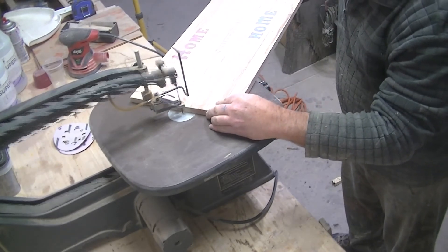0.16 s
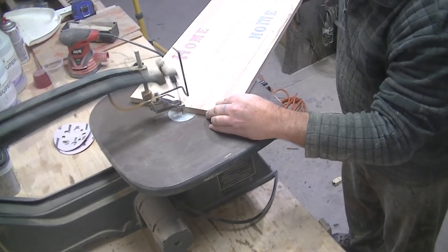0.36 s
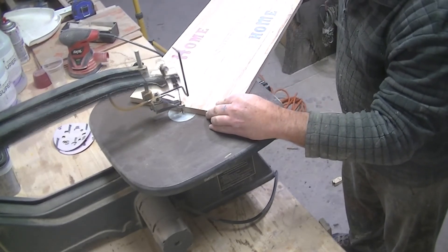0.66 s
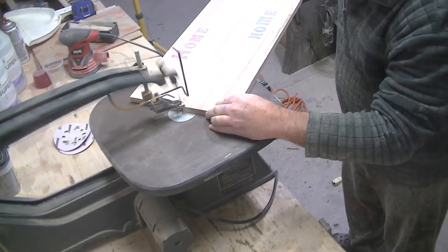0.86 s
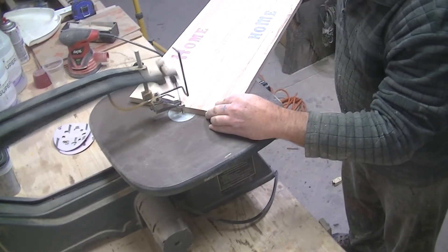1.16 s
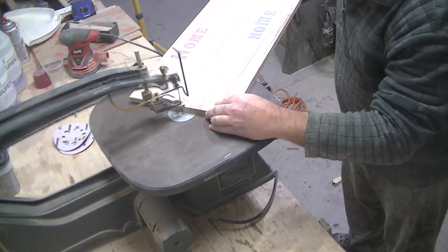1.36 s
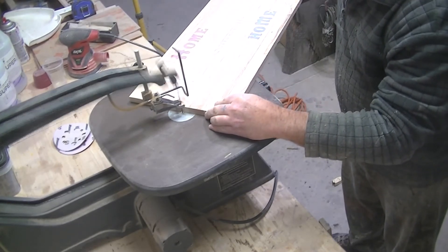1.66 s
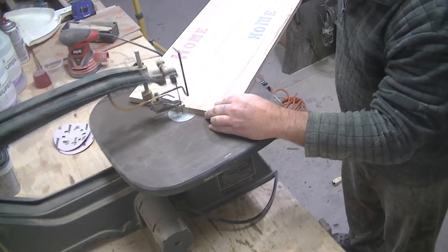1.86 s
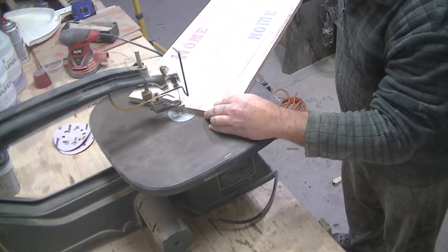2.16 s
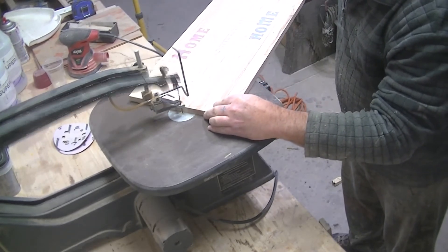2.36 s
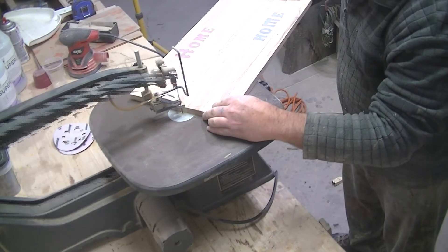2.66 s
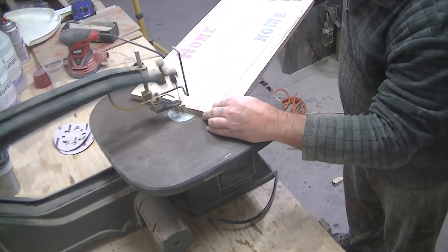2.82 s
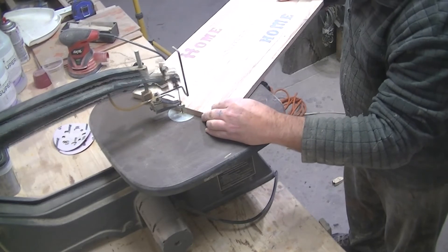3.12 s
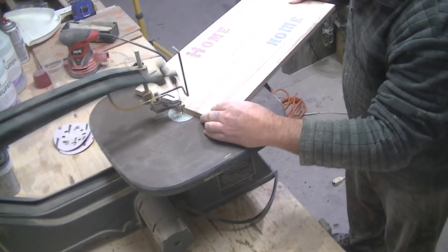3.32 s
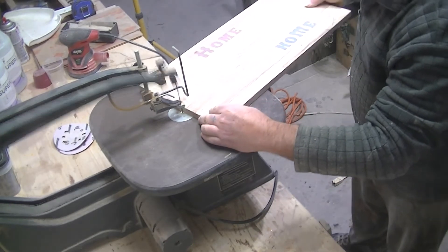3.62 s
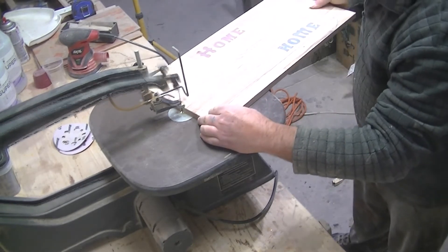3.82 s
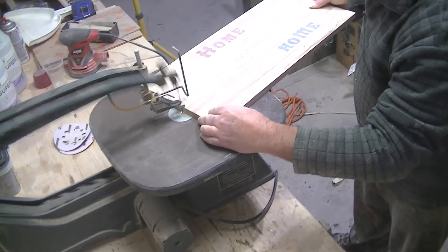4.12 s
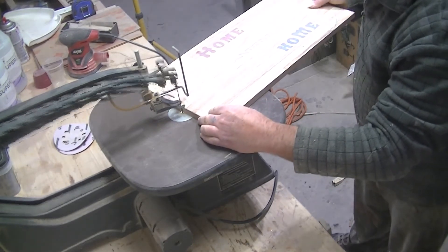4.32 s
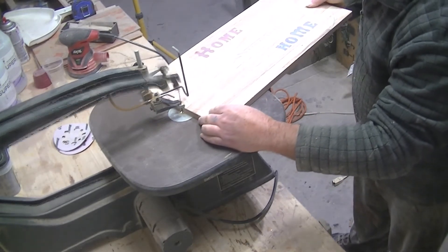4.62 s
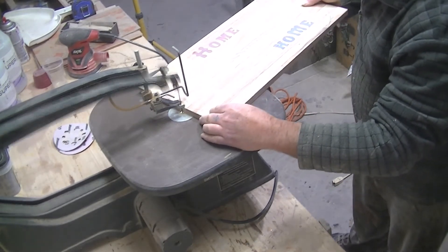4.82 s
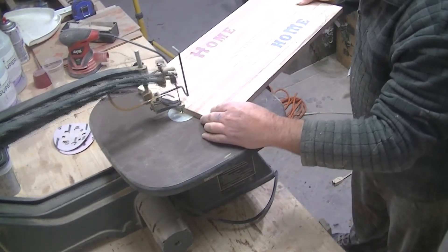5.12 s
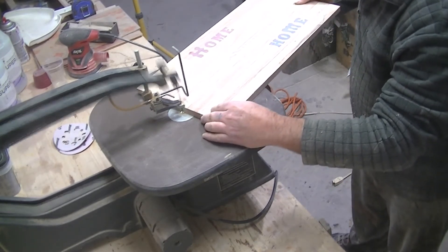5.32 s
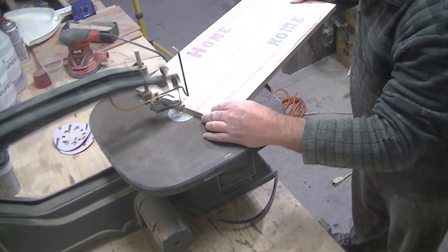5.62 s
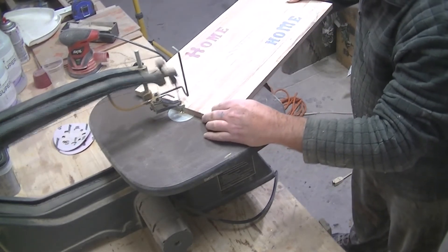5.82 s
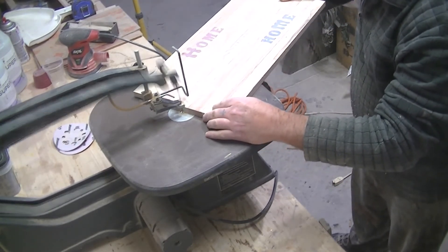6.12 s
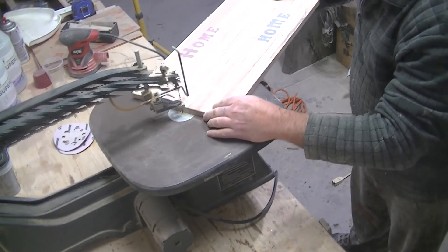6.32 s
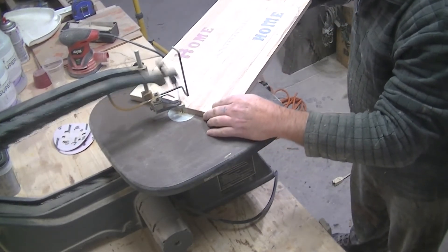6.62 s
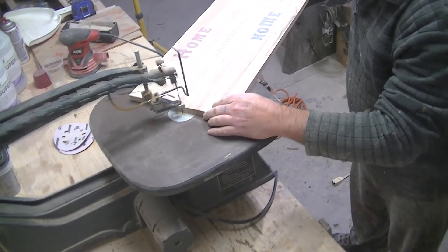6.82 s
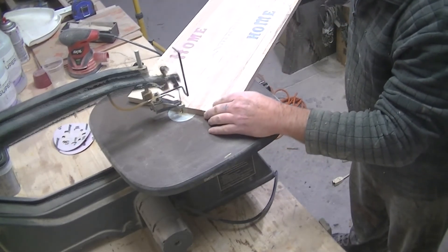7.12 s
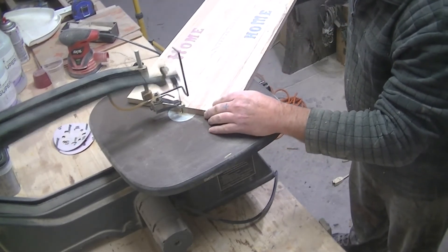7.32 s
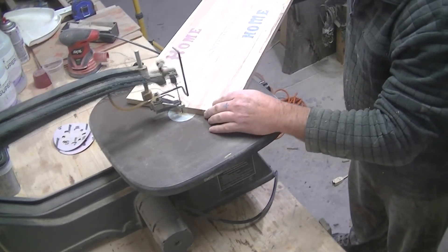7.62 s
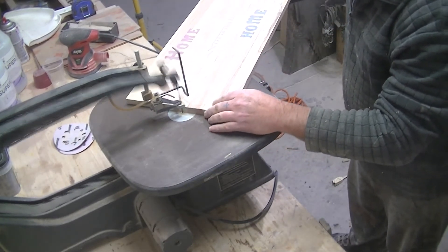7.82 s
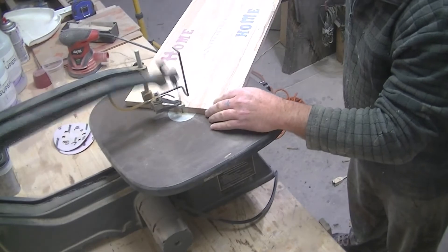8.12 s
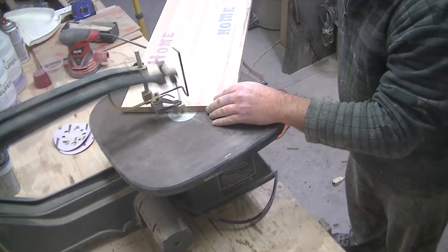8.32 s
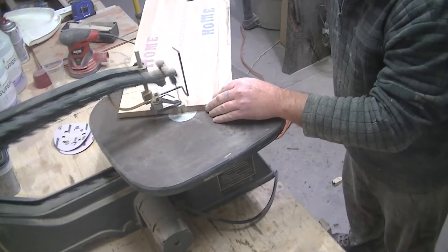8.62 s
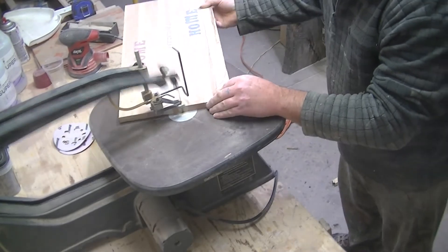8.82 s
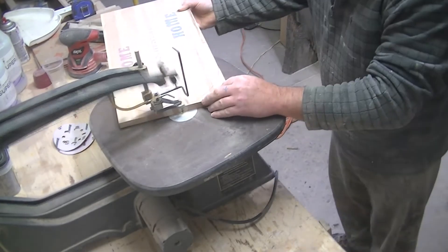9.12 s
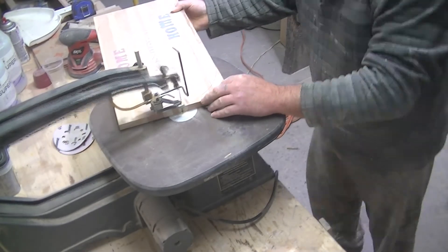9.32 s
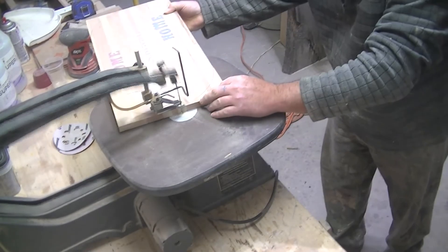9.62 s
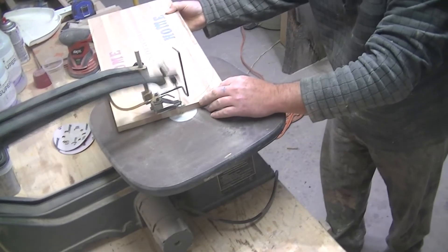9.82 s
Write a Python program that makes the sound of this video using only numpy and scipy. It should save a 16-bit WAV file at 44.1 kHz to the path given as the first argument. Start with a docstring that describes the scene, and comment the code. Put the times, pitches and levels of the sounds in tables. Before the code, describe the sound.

Close by in a small workshop, a scroll saw chatters through a wooden board at a fast, even pace. The frame hums, loose parts rattle and the blade rasps and rings, while the board now and then jumps and knocks on the table. Near the end the sawing abruptly gives way to a quiet, high, sped-up buzz with a sizzling hiss.

```python
"""A scroll saw cuts a glued board in a small workshop, at about 31 strokes a second.
Its arm clacks and makes the frame hum, loose parts rattle, and the teeth rasp and squeak in the wood.
The blade also lifts the board, which knocks as it lands back on the table.
After a quick fade the sawing returns, sped up eight times: a thin, quiet, hissy buzz."""
import sys
import numpy as np
from scipy import signal
from scipy.fft import irfft, next_fast_len
from scipy.io import wavfile

SR = 44100
rng = np.random.default_rng(int(sys.argv[2]) if len(sys.argv) > 2 else 0)


def master_out(mix):
    """Clip the mix to full scale and print it as 16-bit PCM to the path in sys.argv[1]."""
    frames = np.transpose(np.atleast_2d(mix))
    ceiling = np.clip(frames, -1, 1)
    pcm = np.round(ceiling * 32767).astype(np.int16)
    wavfile.write(sys.argv[1], SR, pcm)


N = 439236

# One turn of the crank is one stroke of the blade. An angle is a place in that turn, from 0 to 1.
# how fast the crank turns while cutting: time_s, strokes_per_s
CRANK_SPEED = [(0.0, 31.251), (0.8, 31.243), (1.6, 31.194), (2.05, 31.175), (2.22, 30.789), (2.38, 31.222),
               (2.6, 31.122), (3.0, 31.183), (4.0, 31.206), (5.0, 31.214), (6.0, 31.177), (7.0, 31.167),
               (8.12, 31.192)]
# how hard the hand pushes the board into the blade (0 is ordinary): time_s, push_db
HAND_PUSH = [(0.0, 0), (0.22, -2), (0.75, -0.5), (1.08, 1), (1.6, 2), (2.68, 2), (2.82, 0), (3.04, 1.75),
             (3.6, 1), (4.2, 0.3), (4.98, 2.5), (5.3, -0.5), (5.65, -1.5), (6.0, -1.3), (6.35, -2.5),
             (6.62, 0), (7.1, -0.5), (8.08, 0.1)]
# where the arm's loose joints clack in each stroke: angle_turns, relative_db
ARM_CLACKS = [(.05, -0.5), (0.279, -1), (.48, 1), (.745, -2.5), (.88, 1)]
# the tones in the hum of frame and table: stroke_rate_multiple, relative_db
FRAME_TONES = [(1, -40), (2, -28), (3, -29.5), (4, -27.5), (5, -25), (6, -23), (7, -20), (8, -21.5),
               (9, -18.5), (10, -17.5), (11, -11), (12, -15.5), (13, -4), (14, -5), (15, -3), (16, -5.5),
               (17, -7.5), (18, -5), (19, -14.5), (20, 1.5), (21, -41.5), (22, -71), (23, -25.5), (24, 0),
               (25, -22), (26, -23), (27, -17.5), (28, -7.5), (29, -3), (30, -1), (31, -3), (32, 2.5),
               (33, -3.5), (34, -5.5), (35, 0), (36, -8), (37, -7), (38, -35), (39, -7), (40, -11),
               (41, -1.5), (42, -1.5), (43, -2.5), (44, 0), (45, -31), (46, -21), (47, -23), (48, -2),
               (49, -5), (50, -32.5), (51, -5), (52, 1)]
# the tones at which board and table ring: stroke_rate_multiple, level_db, db_per_push_db
BOARD_TONES = [(31, -43, 0), (35, -41, -0.9), (44, -42.5, 2.5), (48, -44.5, 2.6), (49, -40, 0.3)]
# a loose grip lets one of them sing out: start_s, end_s, stroke_rate_multiple, boost_db
BOARD_SINGING = [(0.4, 0.7, 31, 11.5), (3.293, 4.107, 44, 10.5), (4.327, 4.736, 44, 10), (5.95, 6.1, 44, 7),
                 (6.523, 6.72, 44, 11.5), (7.4, 7.753, 44, 14), (6.72, 6.9, 48, 8.5),
                 (7.45, 8.12, 48, 15.5)]
# rubbing over one stroke, weakest where the blade turns round: angle_turns, level_db
STROKE_RUBBING = [(0, 1), (.12, 1), (.3, 2), (.45, -1.5), (.62, -7.5), (.74, -3.5), (.86, 1.5)]
# the tone colour of saw and board: pitch_hz, relative_db
SAW_COLOUR = [(35, -85), (60, -42.5), (248, -20.5), (403, -11), (533, -16.5), (613, -7), (673, -11),
              (738, -8.5), (1320, -3), (2050, -8.5), (2250, -6.5), (4630, -15), (6120, -17.5),
              (7540, -19.5), (10500, -28.5), (15500, -37)]
# where arm, blade and table resonate: pitch_hz, width_hz, boost_db
SAW_RESONANCES = [(1880, 270, 3.5), (2210, 99, 2.5), (3130, 280, 0), (3485, 270, 5), (3980, 140, -1.5),
                  (4700, 210, 4), (5560, 200, 4.5), (6340, 410, 1.5), (6680, 480, 5.5), (7480, 590, 7),
                  (7930, 120, 4.5), (8600, 320, 6), (9240, 490, 3), (9750, 520, 5.5), (10500, 480, 5),
                  (11600, 260, 6.5)]
# the teeth rasp twice a stroke, going up and going down: angle_turns, level_db
TOOTH_RUBBING = [(.05, -3), (.16, 2), (.28, 0.5), (.42, -1), (.6, -5), (.7, -2), (.82, 3), (.92, -1)]
# the teeth only skim the wood, so the rasp is softer: start_s, end_s, change_db
LIGHT_CUTS = [(5.297, 5.78, -0.3), (6.18, 6.522, -2.3)]
# the notes of the tight blade: pitch_hz, width_hz, relative_db
BLADE_NOTES = [(4630, 160, 0), (5580, 220, -4)]
# how loudly the blade rings: time_s, level_db
BLADE_LOUDNESS = [(0, -45), (.4, -41), (.75, -42), (1.1, -39), (1.7, -37.5), (2.3, -37), (2.8, -42),
                  (3.5, -43), (4.0, -41.5), (4.6, -45), (5.6, -46), (6.0, -42), (6.35, -49), (6.9, -41.5),
                  (7.5, -45), (8.0, -42)]
# bands of rough rasp or ringing swell and fade:
# middle_s, half_length_s, pitch_hz, glide_hz_per_s, width_hz, level_db
RASP_SWELLS = [(0.02, 0.28, 2050, 0, 170, -31), (1.4, 0.48, 6200, -6, 2580, -48),
               (1.47, 0.26, 2700, 6, 200, -36), (1.3, 0.79, 2250, 0.5, 130, -41),
               (2.237, 0.13, 1690, 0, 260, -26.5), (2.66, 0.14, 2670, -6.5, 450, -32.5),
               (3.95, 0.55, 1905, 1.5, 130, -34.5), (3.065, 0.27, 1800, -1800, 507, -26),
               (3.4, 0.61, 2910, -18, 300, -37), (3.555, 0.19, 950, -3, 500, -26),
               (3.73, 0.68, 5150, -1, 250, -40), (4.824, 0.29, 1143, 4.5, 597, -27.5),
               (4.95, 0.057, 4100, -4, 600, -29.5), (5.0, 0.34, 3040, -13, 330, -35),
               (5.495, 0.66, 1035, 1, 175, -32), (4.5, 1.6, 2910, 1.5, 260, -42),
               (6.85, 0.35, 2220, -2, 180, -33.5), (7.05, 0.76, 951, 1, 110, -34),
               (7.2, 0.26, 1310, 0, 500, -30), (0.657, 0.11, 1250, 0, 450, -30),
               (4.75, 0.73, 938, 1.5, 140, -35), (7.29, 0.24, 2850, -2600, 380, -38),
               (7.846, 1.4, 1554, 154.5, 220, -34.5)]
# the tone colour of the board's knock: pitch_hz, relative_db
KNOCK_COLOUR = [(50, -65), (100, -48), (180, -27.5), (400, -23.5), (750, -5.5), (1350, 1.5), (1800, -1.5),
                (2800, -18.5), (5000, -32), (15000, -73)]
# where the board resonates when it lands: pitch_hz, width_hz, boost_db
BOARD_RESONANCES = [(183, 60, 4.5), (820, 260, 4.5), (1294, 380, 8), (1800, 260, 2.5), (2840, 700, 16.5)]
# the board hammers on the table: start_s, end_s, level_db, lands_early_turns
BOARD_JUMPS = [(0.764, 1.106, -29.5, 0.02), (1.38, 2.13, -29.5, 0), (2.129, 2.467, -26.5, 0.1292),
               (3.058, 3.26, -34, 0.03), (3.268, 3.877, -29, 0.07), (3.896, 4.41, -34, 0.01),
               (4.426, 4.703, -30, 0.01), (4.71, 5.2, -35.5, 0.013), (6.55, 7.3, -47.5, 0),
               (7.297, 7.51, -36.5, 0), (7.515, 8.1, -32.5, 0.07)]
# its hardest landings: time_s, peak_db
BOARD_SLAMS = [(0.797, -16.5), (0.829, -15), (0.924, -18), (0.957, -16), (1.469, -13), (1.919, -12.5),
               (2.012, -11), (2.171, -8), (2.236, -14.5), (2.298, -7.5), (2.363, -10), (3.331, -9.5),
               (3.456, -11.5), (3.684, -12.5), (4.485, -16), (4.517, -12), (4.549, -13), (4.581, -12),
               (7.593, -14), (7.625, -14)]
# a few teeth catch and squeak: start_s, end_s, pitch_hz, width_hz, angle_turns, level_db
TOOTH_SQUEAKS = [(3.12, 4.2, 1800, 170, 0.27, -37), (6.85, 7.45, 2900, 550, 0.48, -41),
                 (3.9, 4.7, 10240, 1500, 0.7, -54), (3.85, 4.45, 7000, 400, 0.23, -44),
                 (7.45, 8.15, 7400, 900, 0.36, -44), (4.9, 4.9, 7350, 400, 0.45, -46),
                 (5.98, 6.17, 9100, 600, 1, -48.5), (6.4, 7.4, 7570, 360, 0.27, -44.5),
                 (7.55, 8.08, 9600, 450, 0.71, -54.5), (7.7, 8.1, 1600, 240, .82, -40)]

# the crank's speed in the sped-up sawing: time_s, strokes_per_s
FAST_CRANK_SPEED = [(8.15, 249.7), (8.44, 249.4), (8.6, 248.3), (8.7, 249), (9.01, 249), (9.04, 234),
                    (9.09, 242), (9.165, 245.7), (9.27, 248.2), (9.48, 249), (9.8, 248.5), (9.96, 246.5)]
# the hand's push in the sped-up sawing: time_s, push_db
FAST_HAND_PUSH = [(8.16, 0.5), (8.22, -1.5), (8.33, 0), (8.41, -6), (8.46, 4), (8.52, 1), (8.6, 6.5),
                  (8.7, -3), (8.76, -1.5), (9.01, -8), (9.055, -2.5), (9.1, -6.5), (9.25, -3), (9.5, -7),
                  (9.62, 1), (9.68, 3), (9.83, 4), (9.96, 4.5)]
# the tones in the buzz: stroke_rate_multiple, relative_db
BUZZ_TONES = [(7, -72.5), (9, -72), (10, -79), (11, -68), (12, -73), (13, -66.5), (14, -62), (15, -68),
              (16, -64), (17, -68), (18, -66), (19, -68), (20, -58.5), (21, -68), (22, -73), (23, -63),
              (24, -62), (25, -71), (27, -78), (28, -70), (29, -67), (30, -63), (31, -59.5), (32, -58.5),
              (33, -62), (34, -64), (35, -60), (36, -64), (37, -62), (38, -62), (39, -71), (40, -65),
              (41, -66), (42, -66), (43, -64), (44, -59), (45, -67), (46, -64), (47, -66), (48, -66),
              (49, -59), (50, -69), (51, -69), (52, -64), (53, -70), (54, -70), (55, -71), (56, -73),
              (57, -71), (58, -71), (59, -70), (60, -66), (61, -66)]
# tones swell or sink as the board is turned: start_s, end_s, stroke_rate_multiple, change_db
# (rows that end before they start do nothing)
BUZZ_SWELLS = [(8.9, 11, 12, 8), (8.4, 9.25, 20, -3), (9.25, 11, 20, -7), (8.8, 9.15, 14, -5),
               (8.1, 9.2, 31, 3), (8.3, 8.64, 44, 11), (7.5, 8.62, 48, 9), (8.52, 9.1, 14, 6),
               (9.9, 9.27, 24, -10), (9.0, 9.27, 19, -7), (9.0, 9.3, 31, -9), (9.2, 9.68, 14, 6.5),
               (9.33, 9.6, 18, 12), (9.1, 9.65, 32, 6), (9.33, 9.62, 31, 6), (9.35, 9.75, 40, 11),
               (9.3, 9.8, 42, 8), (11, 8.7, 36, 8), (9.58, 9.78, 37, 13)]
# the tone colour of the sped-up hiss and rattle: pitch_hz, relative_db
FAST_COLOUR = [(20, -13), (1000, -8.5), (2400, -8.5), (3300, -5.5), (4500, -10.5), (6500, -3.5), (8000, -8),
               (10500, -4.5), (12000, -3), (14000, -7), (15700, -6.5)]
# the tone colour of the sped-up knocks: pitch_hz, relative_db
FAST_KNOCK_COLOUR = [(100, -26), (3000, -20), (8000, -6), (9300, 4), (10800, 19), (12000, 4), (13200, -4),
                     (14000, -12), (16000, -20)]
# the board slides round on the table: start_s, end_s, level_db
BOARD_SLIDES = [(8.433, 8.662, -61), (8.697, 8.835, -62), (9.22, 9.352, -58.5)]
# the tone colour of that sliding: pitch_hz, relative_db
SLIDE_COLOUR = [(100, -7), (400, -9), (900, 0), (1600, -10), (4000, -6), (12000, -29)]
# how wide the stereo sound is: pitch_hz, side_minus_mid_db
STEREO_WIDTH = [(60, -51), (130, -43.5), (380, -29), (700, -28.5), (1290, -29), (2380, -21.5),
                (4400, -13.5), (8120, -28.5), (15000, -49.5)]

# how each layer follows the hand: level_db at an ordinary push, db_per_push_db
SHAKE, RATTLE, TAPPING = (-40.5, 1), (-31, 0.94), (-53.5, 5)
BITE, FIZZ, SPRAY = (-30.5, 1.35), (-36, 1), (-41.5, 0.59)
FAST_HISS, FAST_RATTLE, FAST_SIZZLE, FAST_BUZZ = (-62, 0.63), (-51.5, 0.7), (-44, 1.2), (-49, 0.06)
FADE_OUT_S, SPEED_UP_S, FADED_IN_S = 8.082, 8.12, 8.15


def amp(db):
    """Turns decibels into a gain to multiply by."""
    return 10 ** (np.asarray(db) / 20)


def unit_level(x):
    """Scales a signal to an average power of 1."""
    return x / np.sqrt(np.mean(x ** 2) + 1e-20)


def curve(rows, t):
    """Joins the points of a table with straight lines."""
    return np.interp(t, *np.transpose(rows))


def spell(t, start, end, ramp_s):
    """Rises from 0 to 1 around start, holds, and falls around end."""
    return np.clip(np.minimum(t - start, end - t) / ramp_s + .5, 0, 1)


def follow(layer, push_db):
    """The gain of a layer that changes with the hand's push."""
    db, slope = layer
    return amp(db + slope * push_db)


def colour(x, spectrum, resonances=(), band_hz=None, size=4096):
    """Filters x with a broad tone colour, adds resonances, and can keep just one band."""
    hz = abs(np.fft.fftfreq(size, 1 / SR)) + 1
    pitches, levels = np.transpose(spectrum)
    db = np.interp(np.log(hz), np.log(pitches + 1), levels)
    for centre, width, boost in resonances:
        db = db + boost / (1 + (2 * (hz - centre) / width) ** 2)
    if band_hz:
        low, high = band_hz
        db = db - 10 * np.log10((1 + (low / hz) ** 12) * (1 + (hz / high) ** 12))
    log_gain = np.log(amp(np.maximum(db, -100)))
    taps = np.fft.ifft(np.exp(np.conj(signal.hilbert(log_gain)))).real  # rings only after a hit
    return signal.oaconvolve(x, taps[:size // 2])[:len(x)]


def resonance(x, hz, width):
    """What rings when x shakes something tuned to one pitch."""
    band = signal.butter(2, [hz - width / 2, hz + width / 2], "bandpass", fs=SR, output="sos")
    return unit_level(signal.sosfilt(band, x))


def echo_tail(decay_s, size=16384):
    """Scattered echoes, about 2000 a second, that fall by 60 dB in decay_s."""
    taps = rng.choice([-1., 1.], size) * (rng.random(size) < 2000 / SR)
    taps *= amp(-60 * np.arange(size) / SR / decay_s)
    return taps / np.linalg.norm(taps)


def echoed(x, decay_s, echo_db):
    """Adds dying echoes and keeps about the same power."""
    gain = amp(echo_db)
    echoes = signal.oaconvolve(x, echo_tail(decay_s))[:len(x)]
    return (x + gain * echoes) / np.sqrt(1 + gain ** 2)


def drift(shape, memory):
    """Random values, one row a stroke, that stay alike for about `memory` strokes."""
    keep = np.exp(-1 / memory)
    steps = rng.standard_normal(shape)
    steps[1:] *= np.sqrt(1 - keep ** 2)
    return signal.lfilter([1], [1, -keep], steps, axis=0)


def wander(turns, memory):
    """The same drift as an unbroken curve, mostly between -1 and 1."""
    strokes = np.arange(int(turns[-1]) + 2)
    return np.interp(turns, strokes, drift(len(strokes), memory))


def clicks(turns, angles, play, memory, uneven_db, slack=1):
    """A click at each angle of every stroke; its size drifts, and its place by play * slack turns."""
    n = len(turns)
    shape = (int(turns[-1]) + 1, len(angles))
    strokes = np.arange(shape[0])[:, None]
    looseness = play * np.interp(strokes, turns, slack * np.ones(n))
    when = strokes + angles + looseness * drift(shape, memory)
    size = amp(uneven_db * np.clip(drift(shape, memory), -2, 2)) * rng.choice([-1, 1], len(angles))
    inside = (when > turns[0]) & (when < turns[-2])
    at = np.interp(when[inside], turns, np.arange(n))
    whole, part = at.astype(int), at % 1  # each click is shared between two samples
    size = size[inside]
    return np.bincount(whole, size * (1 - part), n) + np.bincount(whole + 1, size * part, n)


def scrape(turns, tight, loose, memory, dust, count, slack=1):
    """Many tiny clicks a stroke, their play ranging from tight to loose, plus dusty noise."""
    angles = (rng.permutation(count) + rng.random(count)) / count
    play = np.geomspace(tight, loose, count)
    ticks = unit_level(clicks(turns, angles, play, memory, uneven_db=2.5, slack=slack))
    return ticks + dust * rng.standard_normal(len(turns))


def rubbing(turns, rows):
    """How strong the rubbing is at each point of the stroke."""
    return amp(np.interp(turns % 1, *np.transpose(rows), period=1))


def singing(t, rows, multiple):
    """How many dB one tone swells or sinks at each moment."""
    return sum(db * spell(t, start, end, ramp_s=0.16)
               for start, end, tone, db in rows if round(tone) == round(multiple))


def frame_hum(turns, size=4096):
    """The arm's clacks repeat exactly, so the frame hums at clean multiples of the stroke rate."""
    multiples, db = np.transpose(FRAME_TONES)
    multiples = np.round(multiples).astype(int)
    clacks = sum(amp(level) * np.exp(-2j * np.pi * multiples * angle) for angle, level in ARM_CLACKS)
    left_to_board = np.isin(multiples, [round(row[0]) for row in BOARD_TONES])
    tones = np.zeros(size // 2 + 1, complex)
    tones[multiples] = amp(db) * np.exp(1j * np.angle(clacks)) * ~left_to_board
    one_stroke = unit_level(irfft(tones))
    return amp(-33.5) * np.interp(turns % 1 * size, np.arange(size), one_stroke)


def board_ring(t, turns, push_db):
    """Board and table ring along with a few tones of the hum, which change with push and grip."""
    out = np.zeros(len(t))
    renewal = np.cos(2 * np.pi * (turns - .98)) - .5  # each landing renews a singing tone, then it sags
    for multiple, *layer in BOARD_TONES:
        boost_db = singing(t, BOARD_SINGING, multiple)
        sag_db = np.clip(boost_db, 0, 4) * renewal
        grip_db = 2.5 * wander(turns, memory=12)
        tone = np.sin(2 * np.pi * (round(multiple) * turns + rng.random()))
        out += follow(layer, push_db) * amp(grip_db + boost_db + sag_db) * tone
    return np.sqrt(2) * out


def loose_rattle(turns, push_db, slack):
    """Every stroke gives the bench a low shake and rattles the saw's loose parts."""
    friction = rubbing(turns, STROKE_RUBBING)
    bench = friction * scrape(turns, tight=0.014, loose=0.06, memory=8.4, dust=0.59, count=30)
    parts = friction * scrape(turns, tight=0.0064, loose=0.022, memory=11.4, dust=0.13, count=36,
                              slack=slack)
    shake = unit_level(colour(bench, SAW_COLOUR, band_hz=(20, 800)))
    rattle = unit_level(colour(parts, SAW_COLOUR, SAW_RESONANCES, band_hz=(720, 1900)))
    return follow(SHAKE, push_db) * shake + follow(RATTLE, push_db) * rattle


def tooth_scrape(turns, slack, wander_db=2.0):
    """Teeth scrape the wood while the shifting grip damps and frees each resonance of the saw."""
    grain = scrape(turns, tight=.0014, loose=0.01265, memory=7.29, dust=0.31, count=72, slack=slack)
    for hz, width, _ in SAW_RESONANCES:
        band = signal.lfilter(*signal.iirpeak(hz, hz / width, fs=SR), grain)
        grain = grain + (amp(wander_db * wander(turns, memory=7.1)) - 1) * band
    return grain


def lean(turns, push_db, even_push_db=0.7, down_angle=0.81):
    """A hard push favours the cutting downstroke, a light one the rubbing upstroke."""
    swing_db = push_db - even_push_db
    average = np.sqrt(np.i0(2 * np.log(amp(swing_db))))  # dividing by this keeps the power steady
    return amp(swing_db * np.cos(2 * np.pi * (turns - down_angle))) / average


def tooth_rasp(t, turns, push_db, grain, teeth):
    """The teeth rasp going up and going down. Gives a lower bite and a higher hiss."""
    skim = amp(sum(db * spell(t, start, end, ramp_s=0.11) for start, end, db in LIGHT_CUTS))
    cutting = grain * rubbing(turns, TOOTH_RUBBING) * lean(turns, push_db)

    def band(x, layer, band_hz):
        sound = unit_level(colour(x, SAW_COLOUR, SAW_RESONANCES, band_hz))
        return skim * follow(layer, push_db) * sound

    bite = band(teeth + cutting, BITE, band_hz=(2000, 4500))
    fizz = band(cutting, FIZZ, band_hz=(4500, 8200))
    spray = band(cutting, SPRAY, band_hz=(8200, 17000))
    return bite, fizz + spray


def blade_ring(t, turns, push_db, catch_angles=(.19, .82), decay_turns=0.072):
    """The teeth catch once going up and once going down; each catch rings the tight blade."""
    catches = sum(np.exp(-((turns - angle) % 1) / decay_turns) for angle in catch_angles)
    grain = scrape(turns, tight=.001, loose=.008, memory=8, dust=.4, count=60)
    drive = catches * lean(turns, push_db) * grain
    ring = sum(amp(db) * resonance(drive, hz, width) for hz, width, db in BLADE_NOTES)
    return amp(curve(BLADE_LOUDNESS, t)) * unit_level(ring)


def rasp_swells(t, turns, teeth, swing_db=5.5, pulse_angle=0.71):
    """Bands of rough rasp or ringing swell and fade, pulsing once a stroke; some slide in pitch."""
    out = np.zeros(len(t))
    drive = teeth * amp(swing_db * np.cos(2 * np.pi * (turns - pulse_angle)))
    for middle, half_length, hz, glide, width, db in RASP_SWELLS:
        near = abs(t - middle) < half_length
        offset_s = t[near] - middle
        count = len(offset_s)
        ring = signal.hilbert(resonance(drive[near], hz, width), next_fast_len(count))[:count]
        gliding = (ring * np.exp(1j * np.pi * glide * offset_s ** 2)).real
        swell = np.cos(np.pi / 2 * offset_s / half_length) ** 2
        out[near] += amp(db) * swell * gliding
    return out


def jumping(t, push_db):
    """The board taps lightly and at times hammers. Gives its gain and how many turns early it lands."""
    tapping = follow(TAPPING, push_db)
    gain, early = tapping, np.zeros(len(t))
    for start, end, db, lead in BOARD_JUMPS:
        hammering = spell(t, start, end, ramp_s=0.102)
        gain = gain + hammering * (amp(db) - tapping)
        early = early + hammering * lead
    return np.maximum(gain, 0), early


def knocks(turns):
    """Lifted by the blade, the board lands once a stroke, corner first, then bounces and shivers."""
    landing = clicks(turns, np.array([.9, .935, .975]), play=.003, memory=7, uneven_db=1)
    bounce = clicks(turns, np.array([.09]), play=.012, memory=7, uneven_db=2)
    chatter = clicks(turns, rng.random(140), play=.007, memory=7, uneven_db=1)
    shiver = np.exp(-((turns - .89) % 1) / .12) * chatter
    blows = unit_level(landing) + amp(-6) * unit_level(bounce) + amp(2) * unit_level(shiver)
    return unit_level(colour(blows, KNOCK_COLOUR, BOARD_RESONANCES))


def slams(t, decay_s=.0068):
    """The board drops flat on the table from a high lift: a short, dense clatter."""
    out = np.zeros(len(t))
    age_s = np.arange(2048) / SR
    for start, db in BOARD_SLAMS:
        clatter = rng.choice([-1., 1.], len(age_s)) * np.exp(-(age_s / decay_s) ** 2)
        sound = colour(clatter, KNOCK_COLOUR, BOARD_RESONANCES)
        at = round(start * SR)
        out[at:at + len(sound)] += amp(db) * sound / abs(sound).max()
    return out


def squeaks(t, turns, grain, catch_turns=0.098):
    """A few teeth catch and squeak briefly, at the same spot stroke after stroke."""
    out = np.zeros(len(t))
    for start, end, hz, width, angle, db in TOOTH_SQUEAKS:
        gain = spell(t, start, end, ramp_s=0.17)
        near = gain > 0
        offset_turns = (turns[near] - angle + .5) % 1 - .5
        catch = np.exp(-(offset_turns / catch_turns) ** 2)
        out[near] += amp(db) * gain[near] * unit_level(catch * resonance(grain[near], hz, width))
    return out


def sawing(t):
    """The saw at its true pace: the crank sets the rhythm and the hand's push shapes most layers."""
    turns = np.cumsum(curve(CRANK_SPEED, t)) / SR
    push_db = curve(HAND_PUSH, t)
    knock_gain, early = jumping(t, push_db)
    slack = amp(0.87 * push_db)  # under a light hand the rattle repeats and turns into a buzz
    rattle = loose_rattle(turns, push_db, slack)
    grain = tooth_scrape(turns, slack)
    teeth = grain * rubbing(turns, STROKE_RUBBING)
    bite, hiss = tooth_rasp(t, turns + early / 2, push_db, grain, teeth)
    chatter = echoed(rattle + bite + rasp_swells(t, turns, teeth), decay_s=0.24, echo_db=-4)
    hiss = echoed(hiss + blade_ring(t, turns, push_db), decay_s=0.17, echo_db=-4)
    # the chatter dips while the board hangs in the air, then a slam takes the place of the knock
    airborne = sum(spell(t, at - .008, at, ramp_s=.002) for at, _ in BOARD_SLAMS)
    chatter *= amp(-4 * airborne)
    slamming = sum(spell(t, at - .012, at + .012, ramp_s=.004) for at, _ in BOARD_SLAMS)
    knocking = (1 - slamming) * knock_gain * knocks(turns + early)
    landings = echoed(knocking + slams(t), decay_s=0.076, echo_db=-9)
    hum = frame_hum(turns) + board_ring(t, turns, push_db)
    return hum + chatter + hiss + landings + squeaks(t, turns, grain)


def fast_sizzle(turns, push_db, parts):
    """Sped up, the top of the rattle sizzles; under a hard push the board's knocks take over."""
    top = unit_level(colour(parts, FAST_COLOUR, band_hz=(8500, 19000)))
    landings = clicks(turns, np.array([.9, .925]), play=0.014, memory=5.4, uneven_db=6.0)
    knock = unit_level(colour(echoed(landings, decay_s=0.0052, echo_db=13), FAST_KNOCK_COLOUR))
    knock_share = 0.76 / (1 + amp(-3 * (push_db - 3.0)))
    blend = np.sqrt(1 - knock_share) * top + np.sqrt(knock_share) * knock
    return follow(FAST_SIZZLE, push_db) * blend


def fast_buzz(t, turns, wander_db=3):
    """The fast strokes merge into a buzz; the turning board brings out one tone after another."""
    out = np.zeros(len(t))
    for multiple, db in BUZZ_TONES:
        swell_db = wander_db * wander(turns, memory=42) + singing(t, BUZZ_SWELLS, multiple)
        out += amp(db + swell_db) * np.sin(2 * np.pi * (round(multiple) * turns + rng.random()))
    return np.sqrt(2) * out / np.linalg.norm(amp([db for _, db in BUZZ_TONES]))


def slides(t):
    """Wood rubs on the table while the board is swung round."""
    gain = sum(amp(db) * spell(t, start, end, ramp_s=0.037) for start, end, db in BOARD_SLIDES)
    return gain * unit_level(colour(rng.standard_normal(len(t)), SLIDE_COLOUR))


def fast_sawing(t):
    """The saw eight times as fast. The blade sticks briefly in a bend and the buzz breaks up."""
    turns = np.cumsum(curve(FAST_CRANK_SPEED, t)) / SR
    push_db = curve(FAST_HAND_PUSH, t)
    stuck = spell(t, 9.01, 9.085, ramp_s=0.041)
    parts = scrape(turns, tight=0.008, loose=0.031, memory=16, dust=1.3 + stuck, count=48)
    parts *= rubbing(turns, STROKE_RUBBING)
    noise = rng.standard_normal(len(t))
    hiss = follow(FAST_HISS, push_db) * unit_level(colour(noise, FAST_COLOUR, band_hz=(15, 2700)))
    rattle = follow(FAST_RATTLE, push_db) * unit_level(colour(parts, FAST_COLOUR, band_hz=(2800, 8500)))
    sizzle = fast_sizzle(turns, push_db, parts)
    buzz = follow(FAST_BUZZ, push_db) * amp(-15 * stuck) * fast_buzz(t, turns)
    return hiss + buzz + slides(t) + echoed(rattle + sizzle, decay_s=0.036, echo_db=-3)


def scene():
    """Normal sawing, a quick fade through silence, then fast sawing; left and right are nearly alike."""
    t = np.arange(N) / SR
    fade_out = np.interp(t, [FADE_OUT_S, SPEED_UP_S], [1, 0]) ** 2
    fade_in = np.interp(t, [SPEED_UP_S, FADED_IN_S], [0, 1])
    saw = np.concatenate([sawing(t[t < SPEED_UP_S]), fast_sawing(t[t >= SPEED_UP_S])])
    mid = (fade_out + fade_in) * saw
    side = colour(signal.oaconvolve(mid, echo_tail(decay_s=0.037))[:N], STEREO_WIDTH)
    return np.array([amp(-0.8) * (mid + side), amp(-1.0) * (mid - side)])


def record(dry, ceiling=.39, top_hz=15750):
    """Rounds off the highest peaks, then cuts the very top of the treble."""
    rounded = dry / (1 + (dry / ceiling) ** 6) ** (1 / 6)
    lowpass = signal.firwin(1023, top_hz, window=("kaiser", 9), fs=SR)
    return signal.oaconvolve(rounded, lowpass[None], "same")


dry = scene()
out = record(dry)
master_out(out)
```